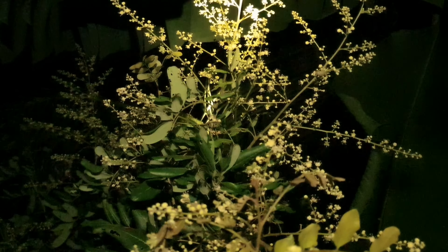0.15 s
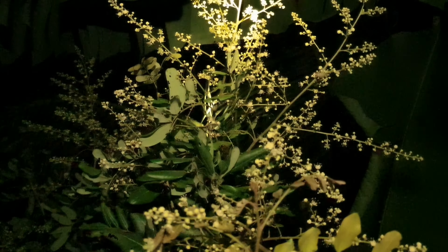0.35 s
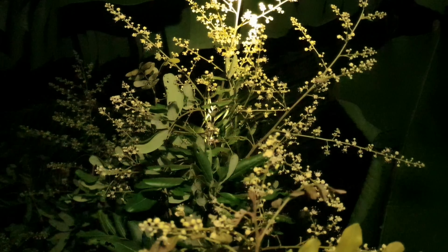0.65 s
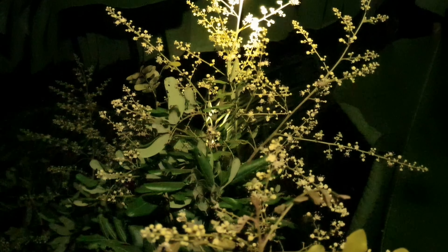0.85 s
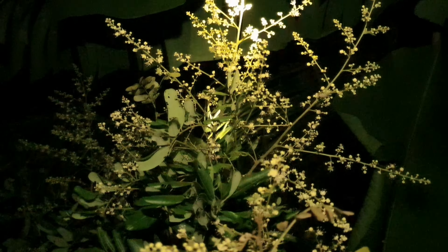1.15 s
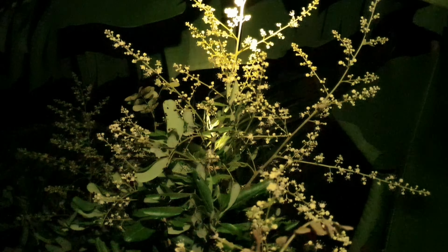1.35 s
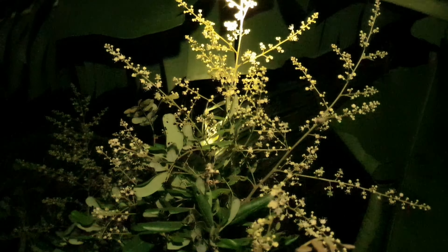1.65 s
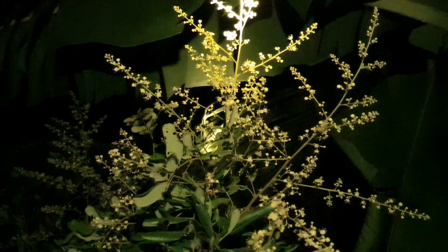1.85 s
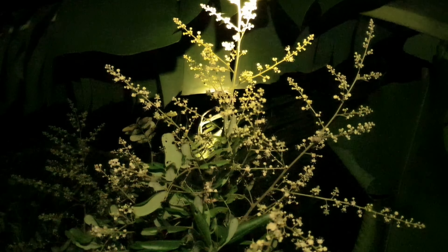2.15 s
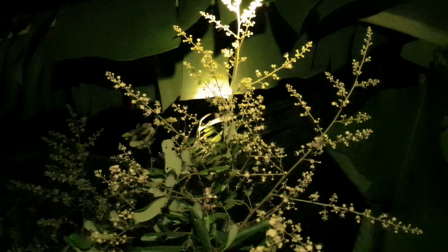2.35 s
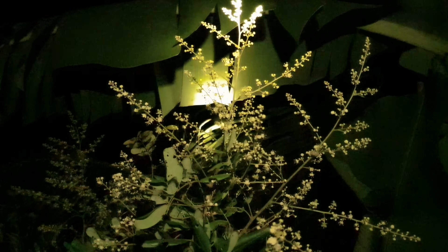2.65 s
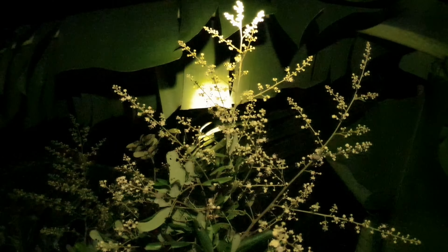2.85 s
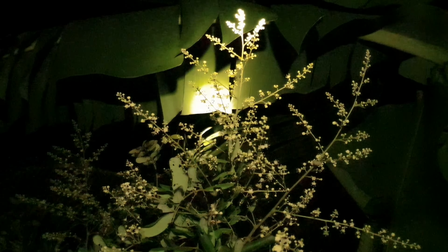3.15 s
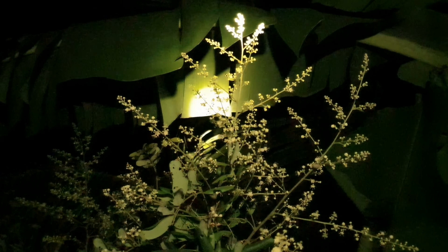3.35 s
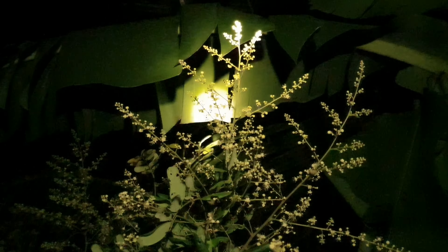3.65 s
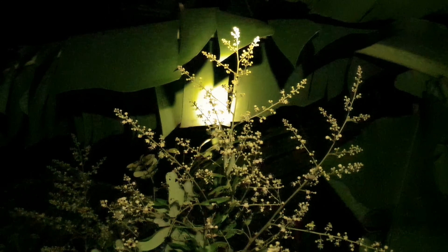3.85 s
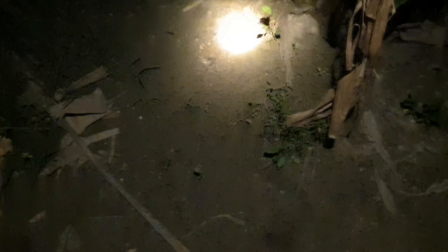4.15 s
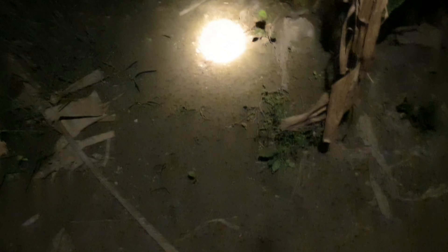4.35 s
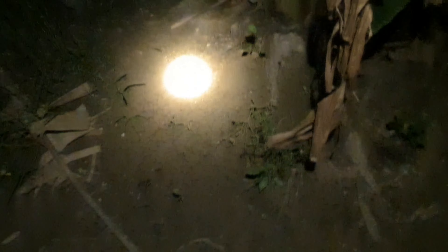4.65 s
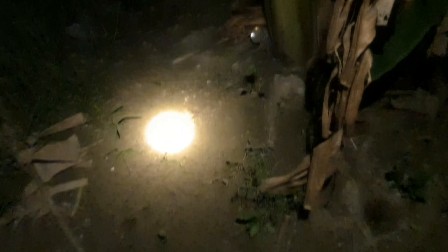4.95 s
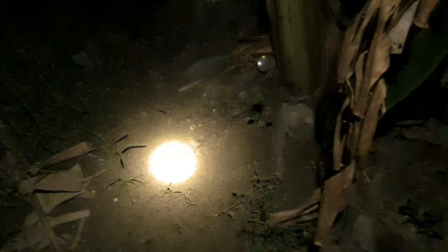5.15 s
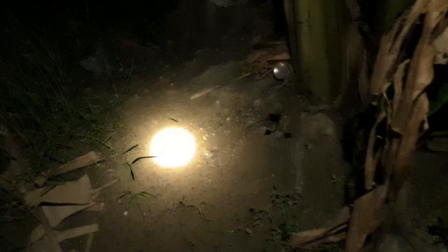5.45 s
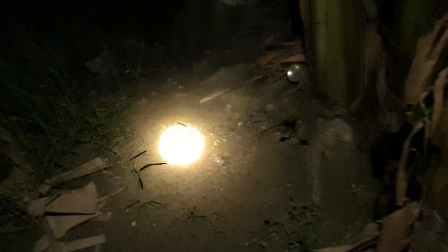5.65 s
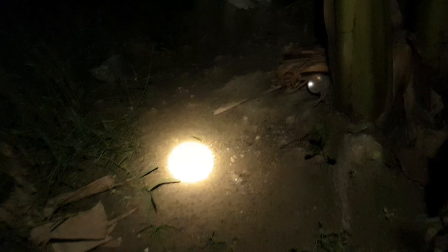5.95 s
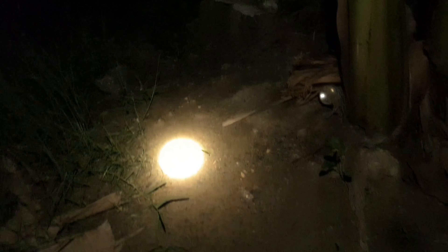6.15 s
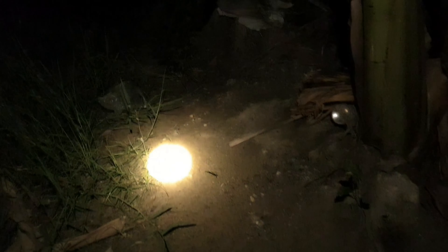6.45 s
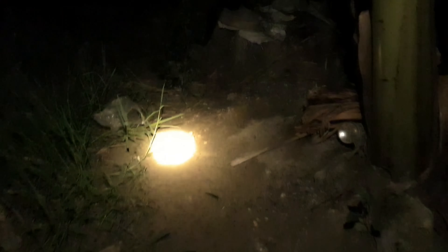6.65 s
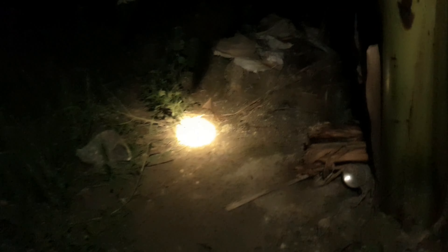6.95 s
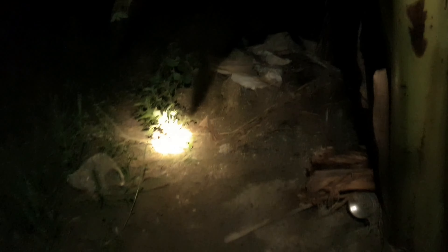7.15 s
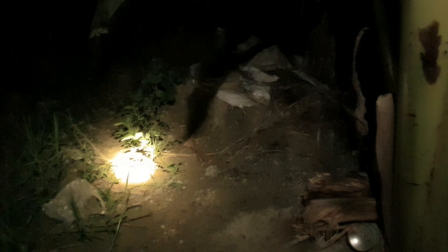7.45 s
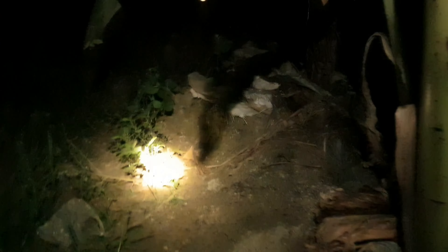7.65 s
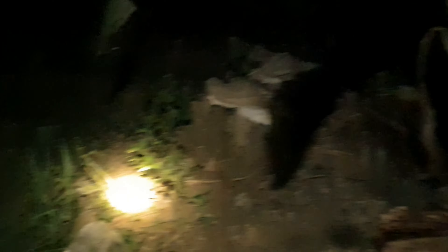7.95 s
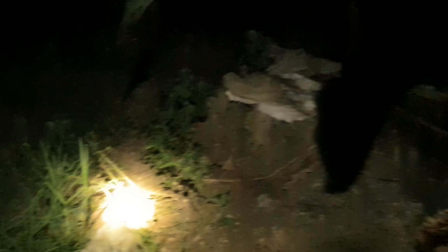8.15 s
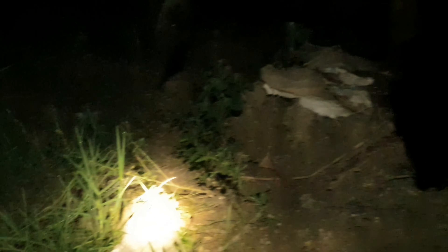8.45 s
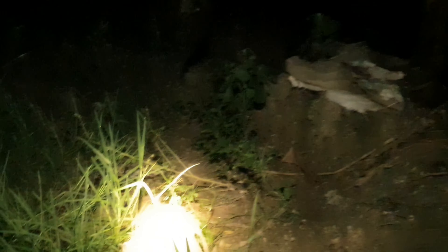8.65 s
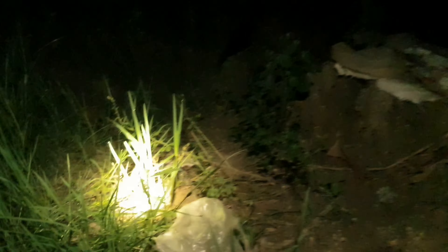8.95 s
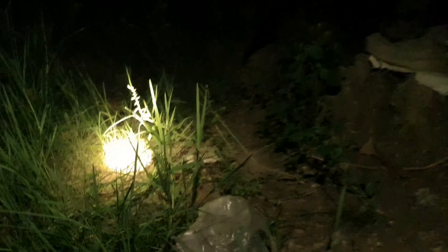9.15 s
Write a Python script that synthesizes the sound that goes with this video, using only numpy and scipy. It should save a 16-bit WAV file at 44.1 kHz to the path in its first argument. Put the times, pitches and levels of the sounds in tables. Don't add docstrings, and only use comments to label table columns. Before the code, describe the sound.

Night garden insects buzz, chirp and trill without pause except one short dropout; afterwards close footsteps crackle in dry leaves and a far dog barks.

```python
import sys
import numpy as np
from scipy import signal
from scipy.fft import rfft, irfft, next_fast_len
from scipy.io import wavfile
from scipy.ndimage import uniform_filter1d

SR = 44100
rng = np.random.default_rng(int(sys.argv[2]) if len(sys.argv) > 2 else 0)


def boost(x):
    u = np.asarray(x, float) / 20
    return 10 ** u


def persist_wave(psi):
    counts = np.round(np.clip(psi, -1, 1) * 32767).astype(np.int16)
    wavfile.write(sys.argv[1], SR, np.atleast_2d(counts).T)


N = 409688


def evened(x):
    return x / np.sqrt(np.mean(x ** 2, -1, keepdims=True) + 1e-20)


def read(points, hz):
    f, value = np.transpose(points)
    return np.interp(np.log(hz + 1), np.log(f + 1), value)


def follow(rows, t):
    s, *columns = np.transpose(rows)
    return [np.interp(t, s, c) for c in columns]


def coloured(x, db_at):
    n = next_fast_len(x.shape[-1])
    gain = boost(db_at(np.fft.rfftfreq(n, 1 / SR)))
    return irfft(rfft(x, n) * gain, n)[..., :x.shape[-1]]


def drift(t, top_hz):
    hz, turn = np.geomspace(top_hz / 20, top_hz, 16), rng.random(16)
    coarse = t[::256]
    waves = np.sin(2 * np.pi * (coarse[:, None] * hz + turn))
    return np.interp(t, coarse, evened(waves @ hz ** -.5))


def ears(x, left_db, right_db, lag):
    return np.array([boost(left_db) * x, boost(right_db) * np.roll(x, lag)])


# f/Hz, level/dB per Hz
RUMBLE = [
    [(15, -31), (40, -13), (58, -5), (71, -8), (86, 0), (103, -5), (125, -10), (150, -13)],
    [(15, -24), (40, -8), (58, 0), (72, -4), (95, -4), (125, -13), (150, -16)],
]
# f/Hz, level/dB per Hz
AIR = [
    [(160, -14.5), (250, -21), (800, -22.5), (1500, -29), (2900, -30.5), (3500, -32.5), (4000, -36),
     (4950, -30.5), (5600, -47), (9000, -32.5), (15000, -40.5)],
    [(160, -15.5), (250, -19.5), (800, -24.5), (1500, -38), (2900, -23), (4000, -24), (4950, -22),
     (5600, -31), (9000, -26.5), (15000, -29)],
]
# f/Hz, likeness 0-1, left lead/rad
PORTS = [
    [(60, .99, 0), (200, .87, .2), (400, .6, 1.3), (700, .55, 2.6), (1200, .65, 3.1), (2500, .2, 3.1),
     (4000, 0, 3.1)],
    [(60, .97, 0), (120, .9, 0), (250, .4, 0), (700, .4, -1.7), (1200, .3, -2), (2500, .15, -3),
     (4000, 0, -3)],
]
# start f/Hz, end f/Hz, start level/dB, end level/dB
HUM = [(57.7, 64, -61, -50), (56.95, 60, -52, -50.5)]


def motor_hum(t, k):
    start_hz, end_hz, start_db, end_db = HUM[k]
    hz = np.linspace(start_hz, end_hz, len(t)) * (1 + .012 * drift(t, 6))
    level_db = np.linspace(start_db, end_db, len(t)) + drift(t, 1.347) + 1.5 * drift(t, 8)
    return np.sin(2 * np.pi * np.cumsum(hz) / SR) * boost(level_db)


def air(t, k):
    base_db = [-44.5, -52.5][k]
    n = next_fast_len(len(t))
    hz = np.fft.rfftfreq(n, 1 / SR)
    left, other = rfft(rng.standard_normal((2, n)))
    f, same, lead = np.transpose(PORTS[k])
    same, lead = np.interp(hz, f, same), np.interp(hz, f, lead)
    right = same * np.exp(-1j * lead) * left + np.sqrt(1 - same ** 2) * other
    z = np.array([left, right]) * boost(read(RUMBLE[k] + AIR[k], hz))
    z /= np.sqrt(np.mean(irfft(z, n) ** 2))
    rumble = irfft(z * (hz < 150), n)[:, :len(t)]
    hiss = irfft(z * (hz >= 150), n)[:, :len(t)]
    murk_start_db, murk_end_db = [(1, -1.5), (0, 0.5)][k]
    murk = coloured(hiss, lambda f: -100. * (f > 1500))
    hiss = hiss + murk * (boost(np.linspace(murk_start_db, murk_end_db, len(t))) - 1)
    rumble = rumble * boost(base_db + 0.8 * drift(t, 3))
    hiss = hiss * boost(base_db - 0.06 + 0.73 * drift(t, 5.2))
    return rumble + motor_hum(t, k) + hiss


FAR = [(.47, .32, .45), (.68, .42, .72)]


def chorus(t, near, wing, far, curve, patchy_db):
    resonance_hz, width_hz, skirt = wing

    def ring(x):
        return evened(coloured(x, lambda f: -6 * abs(2 * (f - resonance_hz) / width_hz) ** skirt))

    patches = np.array([drift(t, 16), drift(t, 20)])
    blur = rng.standard_normal(near.shape) * boost(patchy_db * patches)
    level_db, pan_db = follow(curve, t)
    song = np.sqrt(1 - far) * ring(near) + np.sqrt(far) * ring(blur)
    return song * boost(level_db + 8.0 + np.array([pan_db, -pan_db]) / 2)


# t/s, level/dB, left-right/dB
BUZZ = [
    [(0, -52.5, -7), (2, -51.5, -6), (3.99, -52.5, -4)],
    [(4.08, -51, -2.5), (4.7, -53.5, -3), (5.2, -51.5, -3.5), (9.29, -53, -1)],
]
# f/Hz, width/Hz, skirt exponent
BUZZ_WING = [(2170, 340, 1.58), (2156.5, 282, 1.36)]
# stroke rate/Hz, left level/dB, right level/dB, right port lag/samples
BUZZERS = [
    [(117.3, 0, -1, 6), (116.0, -7, 0, 10)],
    [(117.8, 0, 0, 7), (118.6, -4, -3, 12), (115.8, -6, -5, 17)],
]


def buzzers(t, k):
    near = 0
    for rate, left_db, right_db, lag in BUZZERS[k]:
        strokes = np.cumsum(rate * (1 + .0022 * drift(t, 8))) / SR + rng.random()
        clicks = np.diff(np.floor(strokes), prepend=0) * boost(1.5 * rng.standard_normal(len(t)))
        near = near + ears(clicks * boost(2.2 * drift(t, 6)), left_db, right_db, lag)
    return chorus(t, near, BUZZ_WING[k], FAR[k][0], BUZZ[k], patchy_db=0.86)


# t/s, level/dB, left-right/dB
CHIRP = [
    [(0, -57.5, 1.1), (2, -57, 0.23), (3.99, -57, 1.5)],
    [(4.08, -55, 5.8), (5, -56.5, 1), (9.29, -55.5, 1.5)],
]
# f/Hz, width/Hz, skirt exponent
CHIRP_WING = [(6953, 970, 1.26), (7094, 600, 0.84)]
# chirp rate/Hz, middle of one chirp t/s, left level/dB, right level/dB
CHIRPERS = [
    [(9.46, 1.96, 0, 0), (10.38, 1.965, -5, -11)],
    [(9.16, 6.698, 0, -3), (10.31, 6.723, -1, 0)],
]


def chirpers(t, k):
    near = 0
    for rate, middle, left_db, right_db in CHIRPERS[k]:
        since = (((t - middle) * rate + .5) % 1 - .5) / rate
        strokes = 0
        for offset_s, db in [(-.019, -2.5), (0, 0), (.018, -3.0)]:
            strokes = strokes + boost(db) * np.exp(-((since - offset_s) / .0085) ** 2)
        teeth = rng.standard_normal((2, len(t))) * boost(.8 * drift(t, 3))
        near = near + strokes * teeth * boost(np.array([[left_db], [right_db]]))
    near = coloured(near, lambda f: np.maximum(-6 * ((f - 7170) / 700) ** 2, -40))
    return chorus(t, near, CHIRP_WING[k], FAR[k][1], CHIRP[k], patchy_db=2.5)


# t/s, level/dB, left-right/dB
TRILL = [
    [(0, -55, -10.5), (3.99, -55, -11)],
    [(4.08, -58, -6), (4.7, -61.5, -3.5), (9.29, -58, -3)],
]
# f/Hz, width/Hz, skirt exponent
TRILL_WING = [(10984, 1460, 1.66), (10935, 1460, 2.24)]
# stroke rate/Hz, left level/dB, right level/dB
TRILLERS = [
    [(150.2, 0, 0), (147, -9, -10)],
    [(139.3, 0, -5), (150.5, -6, -4)],
]


def trillers(t, k):
    near = 0
    for rate, left_db, right_db in TRILLERS[k]:
        stroke = (np.cumsum(rate * (1 + .004 * drift(t, 2.2))) / SR + rng.random()) % 1
        roughness = evened(uniform_filter1d(rng.standard_normal(len(t)), size=40))
        hz = 11000 - 3500 * (stroke - .5) + 900 * roughness
        tone = np.sin(2 * np.pi * np.cumsum(hz) / SR) * np.exp(-((stroke - .5) / .26) ** 2)
        near = near + ears(tone * boost(1.5 * drift(t, 5)), left_db, right_db, lag=10)
    return chorus(t, near, TRILL_WING[k], FAR[k][2], TRILL[k], patchy_db=1.73)


# f/Hz, level/dB per Hz
LEAVES = [(300, -10), (900, -1.5), (1500, 3), (3000, 2), (5000, -5.5), (9000, -8), (15500, -13.5)]
# middle t/s, peak level/dB, length/s
STEPS = [(4.735, -64.5, 0.11), (4.866, -70.5, 0.11), (5.262, -73, 0.1), (5.744, -67, 0.35),
         (6.073, -74, 0.11), (6.522, -58.5, 0.21), (6.64, -63.5, 0.089), (6.777, -61, 0.11),
         (6.916, -67, 0.16), (7.133, -64.5, 0.076), (7.386, -71, 0.13), (7.675, -67, 0.24),
         (8.104, -55.5, .02), (8.44, -68, 0.11), (8.734, -68.5, 0.48), (8.988, -74, .15), (9.215, -67, 0.4)]


def rustle(t):
    grains = rng.standard_normal((2, N)) * boost(5.2 * np.minimum(rng.exponential(1, N), 4))
    leaves = evened(coloured(grains, lambda f: read(LEAVES, f)))
    coarse, tread = t[::64], boost(-72)
    for s, db, length in STEPS:
        width = length * np.where(coarse > s, 1.17, 1)
        tread = tread + boost(db) * np.exp(-(2 * (coarse - s) / width) ** 2)
    return leaves * boost(8.0) * np.interp(t, coarse, tread) * (t > SPOTS[1][0])


# t/s, peak level/dB, f/Hz, left-right/dB
SNAPS = [(4.227, -51, 268, -17), (4.573, -39.5, 215, 11), (4.627, -46, 196, -7), (4.699, -50, 288, -4),
         (4.83, -48, 280, -1), (4.923, -52, 318, -3), (5.001, -53.5, 200, -5), (5.714, -46, 1500, 1.5),
         (5.743, -47, 1590, -12), (5.758, -48, 1510, 10), (5.905, -47, 1310, 1), (6.104, -50, 1200, -15),
         (6.46, -49.5, 242, -.5), (6.505, -44, 3170, -1), (6.64, -51, 1200, 2), (6.724, -42, 1530, -.5),
         (6.748, -46, 1110, 3), (6.763, -39, 1650, 0), (6.9, -45, 332, 4), (6.904, -41.5, 607, -9),
         (6.925, -52, 600, 11), (6.934, -50, 1400, -.5), (7.124, -43, 1760, -10), (7.549, -48.5, 730, 0),
         (7.683, -63, 182, -5), (7.699, -50, 1250, -2), (7.788, -45, 1470, 2), (8.099, -45, 1500, 6),
         (8.439, -53.5, 234, -2), (8.989, -53, 1360, -5)]


def snaps():
    out, t = np.zeros((2, N)), np.arange(4000) / SR
    for s, db, hz, pan_db in SNAPS:
        t60 = max(.09 + .005 * (db + 50), .02)
        if hz < 320:
            t60 = t60 * .45
        noise = rng.standard_normal(len(t))
        burst = noise * boost(-60 * t / t60) * np.minimum(t / .0015, 1)
        burst = coloured(burst, lambda f: np.maximum(-6 * abs((f - hz) / (0.18 * hz)) ** 1.1, -26 - f / 600))
        crack = coloured(noise * boost(-60 * t / .006), lambda f: -f / 500)
        burst = burst / abs(burst).max() + boost(-11) * crack / abs(crack).max()
        at = round(s * SR)
        out[:, at:at + len(t)] += ears(boost(db) * burst, pan_db / 2, -pan_db / 2, lag=2.7)
    return out


# first note t/s, period/s, peak level/dB, left-right/dB
TICKER = (4.292, .2815, -54, -2)


def ticker():
    out, t = np.zeros((2, N)), np.arange(3000) / SR
    first, period, db, pan_db = TICKER
    for s in np.arange(first, N / SR, period):
        note = rng.standard_normal(len(t)) * np.exp(-((t - .025) / .02) ** 2)
        note = coloured(note, lambda f: -6 * abs((f - 9300) / 280) ** 0.65)
        note = boost(db) * note / abs(note).max()
        part = out[:, round(s * SR):][:, :len(t)]
        part += ears(note, pan_db / 2, -pan_db / 2, lag=5.8)[:, :part.shape[1]]
    return out


# start t/s, length/s, top f/Hz, level/dB, place of the top 0-1
BARKS = [
    (8.65, .15, 535, -51, .35),
    (9.065, .125, 570, -58.5, .6),
    (9.17, .08, 440, -56, 0),
    (5.9, .12, 400, -63, 0),
    (6.02, .11, 300, -61, .4),
]


def dog(t):
    voice = np.zeros(N)
    for start, length, top_hz, db, top in BARKS:
        on = (t > start) & (t < start + length)
        done = (t[on] - start) / length
        bend = np.where(done < top, 2.6 / (1 + 4 * top ** 2), .35)
        hz = top_hz * (1 - bend * (done - top) ** 2)
        hoarseness = evened(uniform_filter1d(rng.standard_normal(len(hz)), size=300))
        level_db = db - 46 * (done - .5) ** 2 + 3 * hoarseness
        mouth_hz = np.linspace(520, 1300, len(hz))
        jitter = evened(uniform_filter1d(rng.standard_normal(len(hz)), size=150))
        turns = np.cumsum(hz * (1 + .03 * jitter)) / SR
        folds = 0
        for k in range(1, 5):
            mouth = 1 / (1 + ((k * hz - mouth_hz) / 420) ** 2)
            folds = folds + np.cos(2 * np.pi * k * turns) * mouth / k ** 0.092
        voice[on] += evened(folds) * boost(level_db) * signal.windows.tukey(len(hz), .15)
    sparse = rng.random((2, 6000)) < .02
    echoes = rng.standard_normal((2, 6000)) * sparse * boost(-60 * np.arange(6000) / SR / 0.13)
    blurred = signal.oaconvolve(voice[None], evened(echoes) / np.sqrt(6000), axes=1)[:, :N]
    return ears(voice, 0.67, -4.0, lag=4.1) + boost(-1) * blurred


# start t/s, end t/s
SPOTS = [
    (0, 3.9965),
    (4.0752, 9.3),
]


def scene():
    t = np.arange(N) / SR
    out = np.zeros((2, N))
    for k, (start, end) in enumerate(SPOTS):
        on = (t >= start) & (t < end)
        out[:, on] += air(t[on], k) + buzzers(t[on], k) + chirpers(t[on], k) + trillers(t[on], k)
    return out + rustle(t) + snaps() + ticker() + dog(t)


# f/Hz, level/dB
DEAD_ZONE = [
    [(150, -40), (500, -12), (1000, 0), (1500, 0), (2200, -14), (3700, -2), (4000, 5), (4900, -3),
     (5600, 15), (6500, -10), (7500, -10), (8200, 3), (8960, 10), (10000, -14), (12000, -12), (13200, 5),
     (15500, 6.5)],
    [(150, -40), (500, -12), (1000, -6), (1500, -7), (2200, -14), (3700, -2), (4000, 2), (4900, -2),
     (5700, 7), (7000, -10), (9000, 3), (11000, -14), (12800, 4), (15500, 5)],
]


def thinned(x, margins):
    window = np.sqrt(signal.windows.hann(2048, sym=False))
    mid_side = np.array([x[0] + x[1], x[0] - x[1]]) / 2
    hz, t, z = signal.stft(mid_side, SR, window, 2048, 1024)
    band = (12 * np.log(1 + hz / 700)).astype(int)
    middle_hz = 700 * (np.exp((band + .5) / 12) - 1)
    usual = uniform_filter1d(np.median(abs(z) ** 2, axis=2).mean(0), size=9)
    jumps = uniform_filter1d(rng.standard_normal((band.max() + 1, len(t))), size=3, axis=0)
    jump_db = 8.5 * uniform_filter1d(jumps, size=2)[band]
    keep = abs(z) > np.sqrt(usual)[:, None] * boost(read(margins, middle_hz)[:, None] + jump_db)
    z = z * keep * (hz < 15800)[:, None]
    mid, side = signal.istft(z, SR, window, 2048, 1024)[1][:, :x.shape[1]]
    return np.array([mid + side, mid - side])


def top_cut(x):
    return signal.sosfilt(signal.butter(12, 16730, fs=SR, output="sos"), x)


def record(dry):
    cut, back = round(SPOTS[0][1] * SR), round(SPOTS[1][0] * SR)
    smear = round(.011 * SR)
    out = np.zeros_like(dry)
    out[:, :cut] = thinned(dry[:, :cut], DEAD_ZONE[0])
    out[:, back:] = thinned(dry[:, back:], DEAD_ZONE[1])
    out[:, cut:cut + smear] = boost(-29) * dry[:, cut - smear:cut]
    return top_cut(out)


dry = scene()
out = record(dry)
persist_wave(out)
```